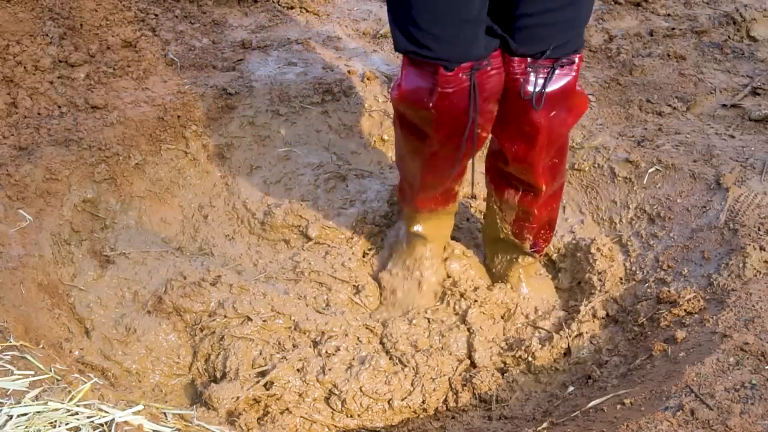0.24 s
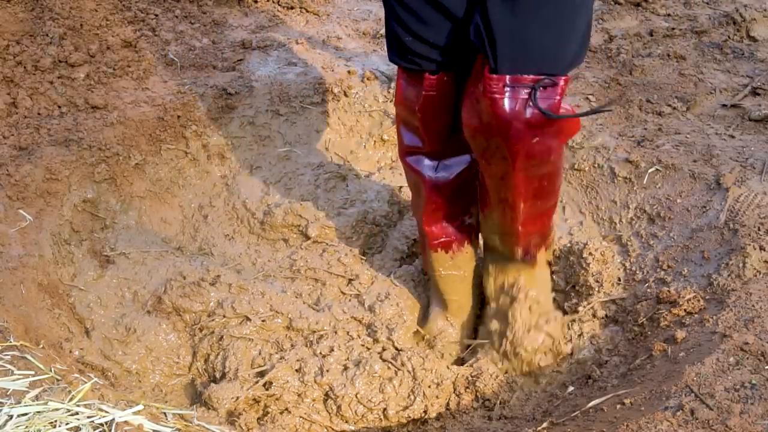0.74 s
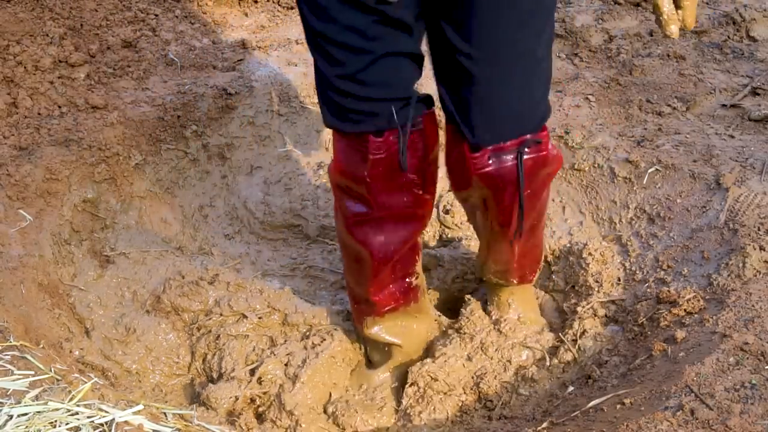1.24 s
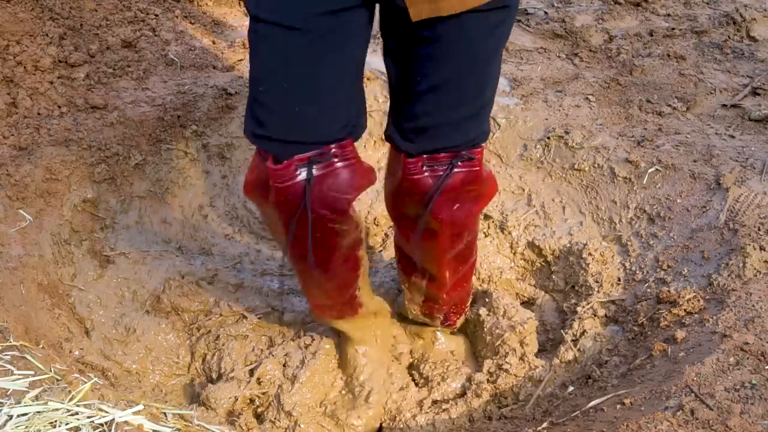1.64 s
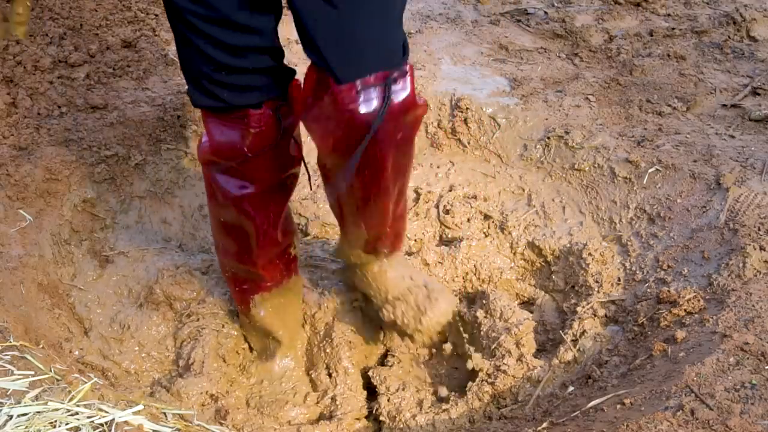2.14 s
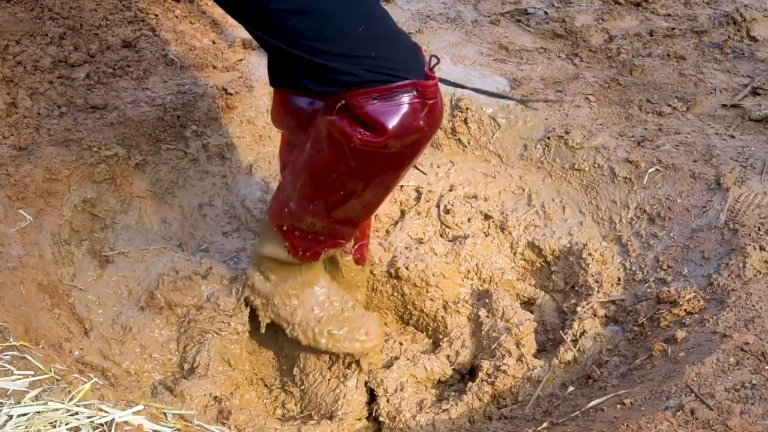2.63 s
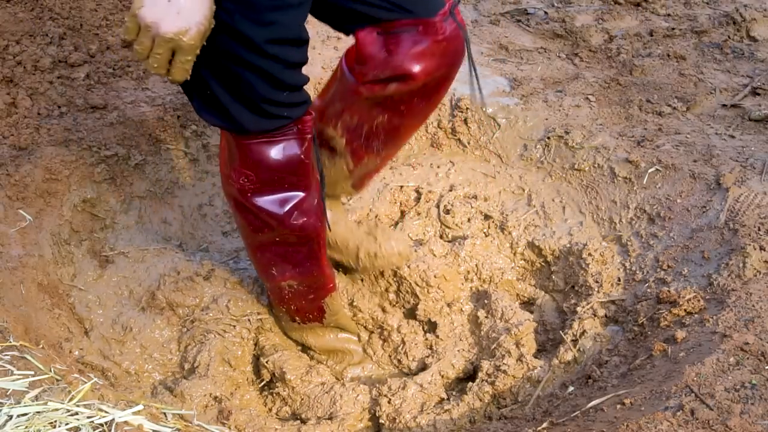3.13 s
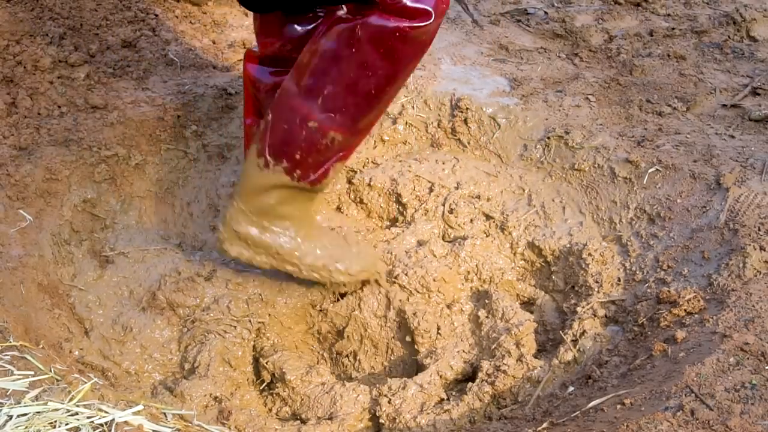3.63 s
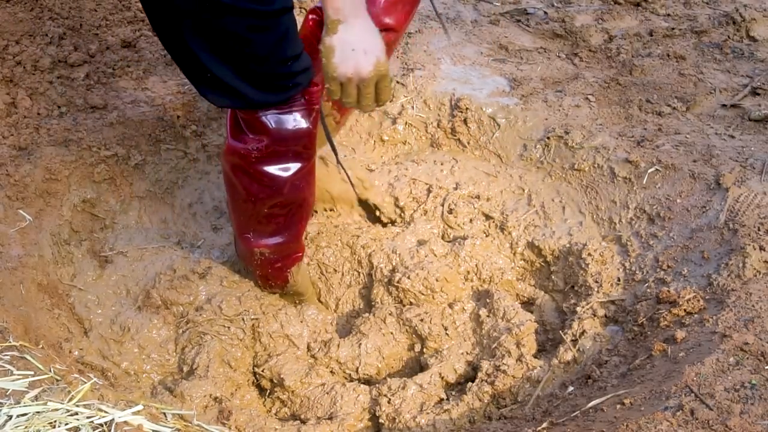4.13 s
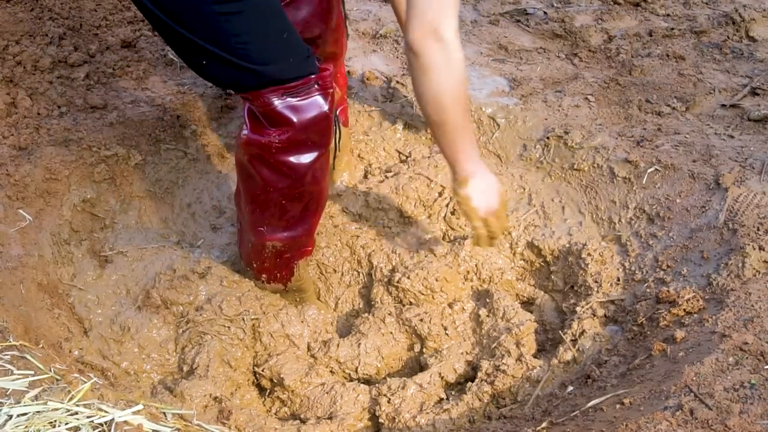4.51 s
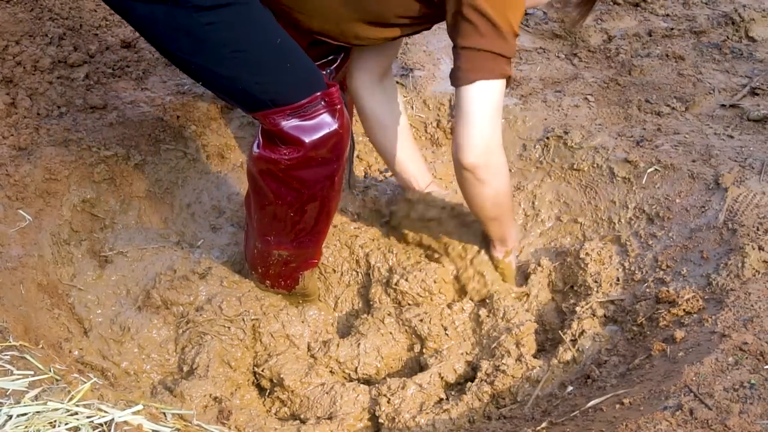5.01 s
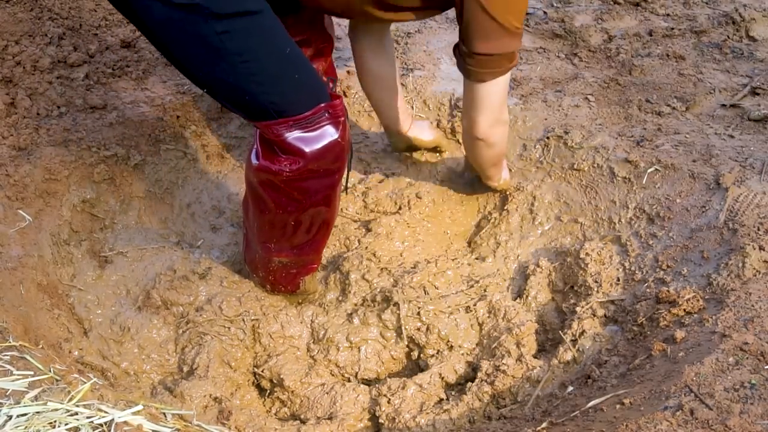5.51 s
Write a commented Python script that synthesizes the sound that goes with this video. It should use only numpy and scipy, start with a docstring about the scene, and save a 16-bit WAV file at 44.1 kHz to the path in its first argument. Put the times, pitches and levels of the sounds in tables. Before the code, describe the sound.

Rubber boots tread rapidly in thick wet mud, squelching, sucking and popping, then slow to faint pushes over soft outdoor air and insect hiss.

```python
"""Rubber boots knead wet clay and straw outdoors; a dragging boot and digging hands then push it slowly.
The mud is a mass of random clicks, each ringing a bubble, with squirts of air coloured by narrow gaps.
Single air pockets pop as decaying rings with noise, and opening hollows gulp as short wobbling tones.
Behind them are soft air and insect hiss made of shaped noise, and a far bird of thin gliding whistles."""
import sys
import numpy as np
from scipy import signal
from scipy.fft import rfft, irfft
from scipy.io import wavfile
from scipy.ndimage import uniform_filter1d

SR = 44100
rng = np.random.default_rng(int(sys.argv[2]) if len(sys.argv) > 2 else 0)


def generate_wav(sig):
    """Save sig (samples, or channels by samples) to the path in sys.argv[1] as 16-bit PCM at SR."""
    pcm = np.round(np.clip(np.atleast_2d(sig).T, -1, 1) * 32767).astype(np.int16)
    wavfile.write(sys.argv[1], SR, pcm)


N = 254016
TIME = np.arange(N) / SR   # seconds
CUTOFF_HZ = 16000   # top of the whole sound

# a boot splashes in, then kneads: (time [s], kneading length [s], crackle level [dB], brightness [dB],
# splash length [s], splash level [dB])
TREADS = [(0.136, 0.14, -48, -3, 0.015, -30), (0.501, 0.23, -47.5, -1, 0.015, -28.5),
          (0.801, 0.13, -49.5, -1, 0.018, -38), (1.188, 0.17, -50.5, 0, 0.025, -33.5),
          (1.528, 0.18, -46.5, -0.5, .028, -36), (1.925, 0.29, -54.5, 2, 0.032, -32),
          (2.317, 0.24, -49.5, 1, .026, -30.5), (2.748, 0.43, -53, 3, 0.041, -50.5),
          (3.322, 0.32, -54.5, -1, 0.013, -33), (3.791, 0.18, -50.5, -1, 0.034, -43),
          (4.348, 0.13, -56, -6, 0.053, -42)]
# big bubbles, small bubbles, bursting films: (lowest pitch [Hz], highest pitch [Hz], ring sharpness Q)
BUBBLES = [(323.6, 973, 0.87), (1042, 3580, 4), (4200, 18900, 6.4)]


def from_db(db):
    """Turn decibels into a plain gain."""
    return 10 ** (np.asarray(db) / 20)


def rms_one(x):
    """Scale a signal to an average power of 1."""
    return x / np.sqrt(np.mean(x ** 2) + 1e-20)


def over_hz(points, size):
    """Spread the columns of a table over the bins of a spectrum, joined on a log pitch axis."""
    hz, *columns = np.transpose(points)
    bins = np.log(np.fft.rfftfreq(size, 1 / SR) + 1)
    return [np.interp(bins, np.log(hz), column) for column in columns]


def resonance(hz, q):
    """Make one resonant filter section with a gain of 1 at its peak."""
    return np.concatenate(signal.iirpeak(min(hz, .45 * SR), max(q, 1), fs=SR))[None]


def band(low_hz, high_hz):
    """Make a filter that passes only what lies between two pitches."""
    return signal.butter(2, [low_hz, min(high_hz, .45 * SR)], "band", fs=SR, output="sos")


def kneading(big_bubble_db=-1.5):
    """Loose crackle and lone bubbles, as moving mud works trapped air to the surface."""
    levels = working()
    # big bubbles mostly come singly, so they are weaker in the crackle
    gains = from_db(levels + [[big_bubble_db], [0], [0]])
    clicks = burstings(per_s=4000, size_db=-0.5, clump_db=4.5)
    crackle = bubbling(clicks, gains, patch_db=10.0)
    return crackle + blips(levels, level_db=2.5)


def working(press_s=0.012, ease_db_per_s=19):
    """Level of each kind of bubble over time: every tread or push builds, eases and dies away."""
    # slow pushes with no splash, a dragging boot and then digging hands:
    # (time [s], length [s], crackle level [dB], brightness [dB])
    pushes = [(4.143, .19, -70.5, -14.5), (4.807, 0.091, -65, 6), (4.962, 0.15, -60.5, 4),
              (5.14, 0.27, -66.5, 10), (5.54, .2, -74, 14.5)]
    # balance of moving mud: (big bubbles [dB], small bubbles [dB], bursting films [dB])
    crackle_mix = (-3.5, 0, -0.44)
    # mud left to settle: (big bubbles [dB], small bubbles [dB], bursting films [dB])
    resting_mix = (-86, -78, -65)
    # dying away, films ticking longest: (big bubbles [dB/s], small bubbles [dB/s], bursting films [dB/s])
    release_db_per_s = (141, 171, 115)
    power = from_db(resting_mix)[:, None] ** 2
    for s, length, db, brightness_db, *_ in TREADS + pushes:
        t = TIME - s
        ease_db = ease_db_per_s * (np.clip(t, 0, length) - length / 2)
        release_db = np.outer(release_db_per_s, np.maximum(t - length, 0))
        build = np.exp(np.minimum(t, 0) / press_s)
        press = build * from_db(-(ease_db + release_db))
        power = power + (from_db(by_size(crackle_mix, db, brightness_db)) * press) ** 2
    return 10 * np.log10(power)


def by_size(mix_db, db, brightness_db):
    """Levels of the three kinds of bubble: brighter mud has weaker big bubbles and stronger films."""
    return np.array(mix_db)[:, None] + db + brightness_db * np.array([[-1], [0], [1]])


def burstings(per_s, size_db, clump_db, largest=2.6):
    """Clicks of uneven, bounded size that clump within milliseconds but keep steady power over longer spans."""
    slow_noise = uniform_filter1d(uniform_filter1d(rng.standard_normal(N), size=110), size=70)
    clumps = rms_one(slow_noise)
    sizes = from_db(size_db * np.minimum(rng.exponential(1, N), largest) + clump_db * clumps)
    happens = rng.random(N) < per_s / SR
    clicks = sizes * rng.choice([-1, 1], N) * happens
    power = uniform_filter1d(uniform_filter1d(clicks ** 2, size=600), size=400)
    return clicks / np.sqrt(np.abs(power) + 1e-6)


def bubbling(clicks, gains, patch_db, count=11):
    """Each click rings one bubble of every kind; from moment to moment other sizes prevail."""
    out, unit = np.zeros(N), signal.unit_impulse(2048)
    for (low_hz, high_hz, q), gain in zip(BUBBLES, gains):
        edges = band(.7 * low_hz, 1.15 * high_hz)
        dealt = rng.integers(0, count, N)   # which bubble size each click rings
        drive = clicks * gain
        favour = from_db(patch_db * rng.standard_normal((count, 560)))
        favour /= np.sqrt(np.mean(favour ** 2, axis=0))
        moments = np.linspace(0, N, favour.shape[1])
        for k, hz in enumerate(np.geomspace(low_hz, high_hz, count)):
            bubble = np.vstack([resonance(hz, q), edges])
            own = np.flatnonzero(dealt == k)
            strikes = np.full(N, 1e-18)
            strikes[own] = drive[own] * np.interp(own, moments, favour[k])
            # divide so that every size rings with the same energy
            out += signal.sosfilt(bubble, strikes) / np.linalg.norm(signal.sosfilt(bubble, unit))
    return out


def blips(db_levels, level_db, cycles=3.5, rise=0.17, spread_db=10.0, count=420, size=1400):
    """Lone bubbles reach the surface: each rings briefly and rises in pitch."""
    out, t = np.zeros(N + size), TIME[:size]
    kinds = [np.log(low_hz * high_hz) / 2 for low_hz, high_hz, q in BUBBLES]   # log of each middle pitch
    for when, pitch, strength in rng.random((count, 3)):
        at = int(when * N)
        hz = 360 * 10 ** pitch
        age = t * min(hz, 1500) / cycles
        db = np.interp(np.log(hz), kinds, db_levels[:, at])
        db = db + level_db + spread_db * (2 * strength - 1)
        turn = 2 * np.pi * np.cumsum(hz * (1 + rise * np.tanh(age))) / SR
        swell = 2 * age * np.exp(1 - 2 * age)
        out[at:at + size] += from_db(db) * swell * np.sin(turn)
    return out[:N]


def squirts(rise_s=0.003, fall_s=0.0051, sag_db=7.0, gap_q=4.7, gap_gain=0.98,
            level_db=-2.0, thud_db=-26.5, thud_hz=190):
    """Dense crackle that swells and stops, coloured by the gap it escapes through, over a faint thud."""
    gains, gates = np.zeros((3, N)), []
    for s, length, sizes_db, hz in outflows():
        span = slice(max(0, int((s - .01) * SR)), int((s + length + .04) * SR))
        t = TIME[span] - s
        gate = np.exp(np.minimum(t, 0) / rise_s - np.maximum(t - length, 0) / fall_s)
        gate *= from_db(-sag_db * (2 * np.clip(t / length, 0, 1) - 1) ** 2)   # the flow peaks halfway
        gains[:, span] = np.maximum(gains[:, span], from_db(sizes_db) * gate)
        gates.append((span, gate, hz))
    clicks = burstings(per_s=9000, size_db=0.5, clump_db=3.5)
    spray = bubbling(clicks, gains, patch_db=8.0)
    lone = blips(20 * np.log10(gains + 1e-6), level_db=-3.5, count=900)
    rumble = rms_one(signal.sosfilt(resonance(thud_hz, 1.9), clicks))
    out = spray + lone + from_db(thud_db) * gains[0] * rumble
    for span, gate, hz in gates:
        out[span] += gap_gain * signal.sosfilt(resonance(hz, gap_q), spray[span] * gate)
    return from_db(level_db) * out


def outflows(sole_gap_hz=4500):
    """List the splash of each tread and all squirts: time, length, level by bubble size, gap pitch."""
    # wet air forced out of the mud:
    # (time [s], length [s], level [dB], brightness [dB], gap resonance [Hz])
    squirt_list = [(0, 0.033, -37.5, 0, 1480), (0.149, 0.014, -23.5, -4, 2670),
                   (0.248, 0.0033, -28, 0.5, 2730), (0.261, 0.048, -41, -0.5, 3550),
                   (0.523, 0.013, -25, 5.5, 2520), (0.572, 0.047, -32, -8.5, 1850),
                   (0.668, 0.0064, -35, -2.5, 2400), (0.826, 0.019, -31, 2, 2070),
                   (0.893, 0.084, -43.5, 2, 3200), (1.213, 0.048, -39, 5.5, 2560),
                   (1.291, 0.031, -39, -.5, 3550), (1.556, 0.018, -25.5, -4.5, 1150),
                   (1.604, 0.037, -41.5, 9, 5030), (1.672, 0.064, -31, 3, 3100),
                   (2.067, 0.019, -31.5, -6.5, 454), (2.088, .015, -23, -1.5, 677),
                   (2.117, 0.0069, -35.5, -2.5, 4800), (2.457, 0.038, -36, 0.5, 4130),
                   (2.49, .037, -26, 1, 730), (2.893, 0.048, -38.5, -7.5, 720),
                   (2.962, 0.039, -60.5, 13.5, 5000), (3.02, .05, -42, 3, 3160),
                   (3.112, .017, -29, -7, 686), (3.318, 0.005, -25, 2, 2470),
                   (3.474, 0.03, -43.5, -6, 2400), (3.517, 0.0044, -24, 1, 2520),
                   (3.532, 0.013, -33.5, 0, 2400), (3.83, 0.0068, -34, -8, 1800),
                   (4.084, 0.021, -32.5, 4, 2170), (4.436, 0.02, -43, 5.5, 2790),
                   (4.964, 0.0066, -41, 2, 1050), (5.1, 0.033, -58, 7, 1100),
                   (5.346, 0.015, -45.5, -11.5, 764), (5.687, 0.03, -47, 5.5, 3350)]
    # a boot landing: (big bubbles [dB], small bubbles [dB], bursting films [dB])
    splash_mix = (-6.5, 0, 5.64)
    # escaping air: (big bubbles [dB], small bubbles [dB], bursting films [dB])
    squirt_mix = (-7.5, 0, -1.5)
    flows = []
    for s, *_, length, db in TREADS:
        flows.append((s, length, by_size(splash_mix, db, 0), sole_gap_hz))   # the slit under the sole
    for s, length, db, brightness_db, hz in squirt_list:
        flows.append((s, length, by_size(squirt_mix, db, brightness_db), hz))
    return flows


def pops(ring_cycles=4.3, snap_s=0.0015, splat_s=0.0023, ring_db=-9.0, snap_db=-6.0, splat_db=-12.0, size=1500):
    """A film snaps, the pocket behind it rings a few cycles, and wet mud spatters."""
    # single air pockets bursting, levels before the shared trims above:
    # (time [s], ring and spatter level [dB], pocket pitch [Hz], snap level [dB])
    pockets = [(0.145, -9.5, 3500, -12.5), (0.159, -6, 2600, -14), (0.529, -13, 2500, -14),
               (0.622, -16.5, 3900, -28), (0.632, -21, 1220, -25), (0.666, -12, 2370, -43),
               (0.709, -19.5, 2550, -47), (0.882, -18, 3300, -41), (1.191, -15, 4900, -14),
               (1.335, -19, 1930, -21), (1.42, -19, 2220, -36), (1.564, -7, 1810, -9.5),
               (1.431, -28, 4500, -35), (1.993, -20, 2050, -25.5), (2.404, -15, 2120, -17),
               (2.417, -20, 2400, -19), (2.472, -13.5, 3660, -27), (2.781, -24, 2980, -21.5),
               (3.013, -13, 2500, -26.5), (3.09, -13, 1130, -27.5), (3.159, -23.5, 1650, -43),
               (3.317, -21.5, 2450, -18), (3.517, -9.5, 1256, -14.5), (3.833, -18, 1760, -16.5),
               (3.867, -23, 2850, -48), (3.998, -24, 2820, -28), (4.092, -11, 1940, -18.5),
               (4.352, -22.5, 1800, -18), (5.061, -32, 1090, -32.5), (5.344, -15.5, 1000, -29),
               (5.358, -13.5, 1560, -23), (5.628, -49, 4900, -26.5)]
    out, t = np.zeros(N + size), TIME[:size]
    for s, pocket_db, hz, film_db in pockets:
        white = rng.choice([-1., 1.], (2, size))
        ring = np.sin(2 * np.pi * hz * t) * np.exp(-t * hz / ring_cycles)
        splat = rms_one(signal.sosfilt(band(0.61 * hz, 1.48 * hz), white[0])) * np.exp(-t / splat_s)
        snap = rms_one(signal.sosfilt(band(3500, 14400), white[1])) * np.exp(-t / snap_s)
        at = int(s * SR)
        out[at:at + size] += from_db(pocket_db) * (from_db(ring_db) * ring + from_db(splat_db) * splat)
        out[at:at + size] += from_db(film_db + snap_db) * snap
    return out[:N]


def gulps(glide=-0.081, wobble=0.042, flutter=0.53, froth=.42, froth_top_hz=1800):
    """A hollow swells into tone and sinks a little in pitch as it widens; its soft walls wobble and froth."""
    # hollows ringing as they open: (time [s], length [s], pitch [Hz], level [dB])
    hollows = [(0.106, 0.023, 615, -44), (0.686, 0.019, 564, -38.5), (1.277, 0.019, 388, -35),
               (2.039, 0.031, 595, -30), (2.1, 0.011, 680, -25.5), (2.438, 0.011, 784, -34),
               (2.502, 0.037, 683, -31), (3.102, 0.022, 700, -22.5), (3.17, 0.026, 667, -38.5),
               (4.159, 0.034, 367, -48), (4.197, 0.041, 345, -53), (4.25, 0.048, 402, -57),
               (4.365, 0.075, 406, -44.5), (4.406, 0.019, 641, -29.5), (4.457, 0.018, 406, -38),
               (5.338, 0.033, 742, -38)]
    out = np.zeros(N)
    for s, length, hz, db in hollows:
        phase = np.arange(int(length * SR)) / (length * SR)   # 0 to 1 through the gulp
        white = rng.standard_normal((3, 16384))
        walls, neck = rms_one(uniform_filter1d(white[:2], size=90))[:, :len(phase)]
        foam = rms_one(signal.sosfilt(band(hz / 2, froth_top_hz), white[2]))[:len(phase)]
        pitch = hz * (1 + glide * (phase - .5) + wobble * walls)
        turn = 2 * np.pi * np.cumsum(pitch) / SR
        swell = np.sin(np.pi * np.sqrt(phase)) ** 2
        tone = np.sin(turn) * (1 + flutter * neck)
        at = int(s * SR)
        out[at:at + len(phase)] += from_db(db) * swell * (tone + froth * foam)
    return out


def microphones(x):
    """The two ports hear the mud with slightly different level and phase."""
    # microphone pair: (pitch [Hz], left minus right [dB], left lead [rad])
    ports = [(100, -0.5, -0.069), (1050, 1, -0.82), (2130, 0, -0.4), (3860, 3, 1), (7600, 5, -0.14),
             (15200, 2.5, 0.97)]
    balance_db, lead = over_hz(ports, N)
    half = from_db(balance_db / 2) * np.exp(1j * lead / 2)   # each side takes half the difference
    return irfft(rfft(x) * np.array([half, 1 / half]), N)


def clods(x, level_db=-8.0, t60_s=0.048, low_hz=2600, size=2048):
    """Rough ground scatters the treble for a few milliseconds, differently to each ear."""
    scatter = signal.sosfilt(band(low_hz, CUTOFF_HZ), rng.standard_normal((2, size)))
    scatter = scatter * from_db(-60 * TIME[:size] / t60_s)
    scatter /= np.linalg.norm(scatter, axis=1, keepdims=True)
    return from_db(level_db) * signal.fftconvolve(x[None], scatter, axes=1)[:, :N]


def yard(x, t60_s=0.42, level_db=-15.5, size=32768):
    """The surroundings scatter back a faint, dull tail: the mud smeared by fading noise."""
    # tone of the scatter: (pitch [Hz], level [dB])
    scatter_tone = [(100, 16), (400, -36), (700, 3), (1500, -18), (4000, 0), (15000, -7)]
    t = TIME[:size]
    tail = rng.standard_normal((2, size)) * from_db(-60 * t / t60_s) * np.minimum(t / 0.0059, 1)
    tail = tail[0] + .5 * tail[1] * np.array([[1], [-1]])   # shared part plus opposite parts in each ear
    tail = irfft(rfft(rms_one(tail)) * from_db(over_hz(scatter_tone, size)[0])) / np.sqrt(size)
    return from_db(level_db) * signal.fftconvolve(x[None], tail, axes=1)[:, :N]


def outdoors(air_db=-59.5, air_side=1.0, insect_side=1.0):
    """Soft air and the narrow hiss of many insects: filtered noise, partly different in each ear."""
    # tone of the open air, before scaling to air_db: (pitch [Hz], relative level [dB])
    air_tone = [(25, -31), (70, -16.5), (150, -7), (270, -5.5), (450, 4), (900, 5.5), (3000, 3.5),
                (15500, -6.5)]
    # insect chorus: (pitch [Hz], width [Hz], level [dB])
    insects = [(5070, 540, -59), (11300, 910, -67)]

    def noise(side):
        """Noise shared by both ears plus a part that is opposite in each."""
        return rng.standard_normal(N) + side * rng.standard_normal(N) * np.array([[1], [-1]])

    air = irfft(rfft(noise(air_side)) * from_db(over_hz(air_tone, N)[0]), N)
    out = from_db(air_db) * rms_one(air)
    for hz, width, db in insects:
        hiss = signal.sosfilt(band(hz - width / 2, hz + width / 2), noise(insect_side))
        out += from_db(db) * rms_one(hiss)
    return out


def bird(arch=.18, level_db=-58.5):
    """Thin whistles that rise and fall, wavering on their way through the air."""
    # far bird: (time [s], length [s], top pitch [Hz])
    calls = [(4.7, 0.1, 4450), (5.027, 0.058, 4470), (5.642, 0.071, 4200)]
    out = np.zeros(N)
    for s, length, hz in calls:
        phase = np.clip((TIME - s) / length, 0, 1)
        pitch = hz * (1 - arch * np.abs(2 * phase - 1))
        out += np.sin(np.pi * phase) * np.sin(2 * np.pi * np.cumsum(pitch) / SR)
    waver = 1 + .5 * rms_one(uniform_filter1d(rng.standard_normal(N), size=200))
    return from_db(level_db) * out * waver


def scene(pocket_low_hz=300):
    """Mud close by with its reflections, over the outdoor background."""
    # echoes off the ground and the boots: (delay [s], level [dB])
    reflections = [(.00165, -15), (.00252, -22)]
    no_bass = signal.butter(2, pocket_low_hz, "high", fs=SR, output="sos")   # pops and gulps carry no bass
    cavities = signal.sosfilt(no_bass, pops() + gulps() + 1e-18)
    mud = kneading() + squirts() + cavities
    mud = mud + sum(from_db(db) * np.interp(TIME - delay, TIME, mud, left=0) for delay, db in reflections)
    return microphones(mud) + clods(mud) + yard(mud) + outdoors() + bird()


def record(dry):
    """Cut the top steeply, above the cutoff pitch."""
    return signal.sosfilt(signal.ellip(10, .2, 80, CUTOFF_HZ, fs=SR, output="sos"), dry)


dry = scene()
out = record(dry)
generate_wav(out)
```